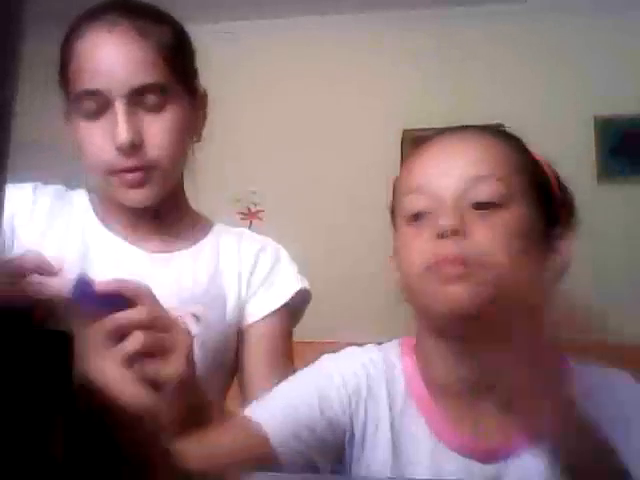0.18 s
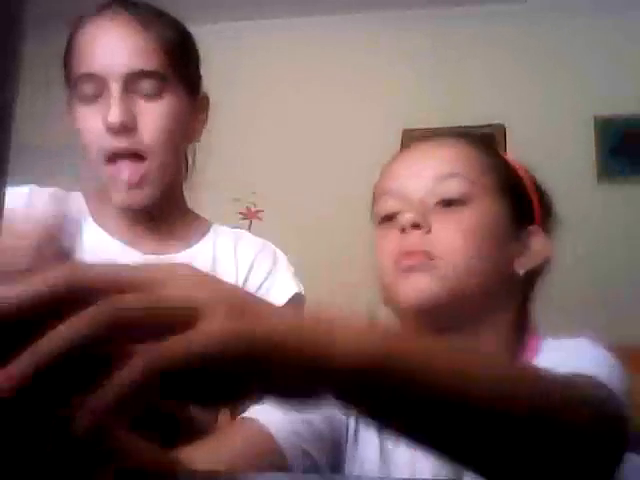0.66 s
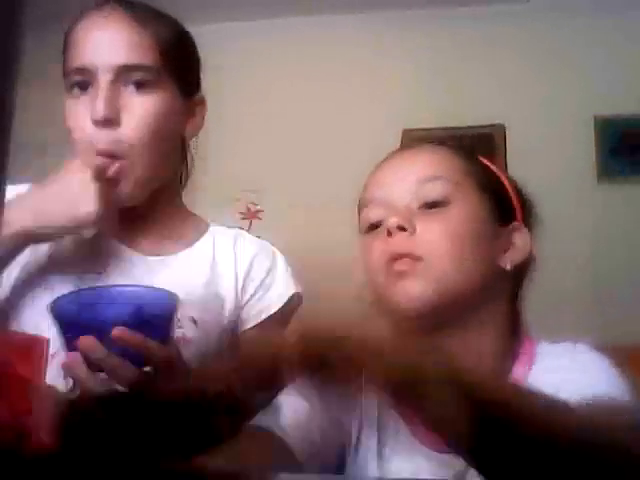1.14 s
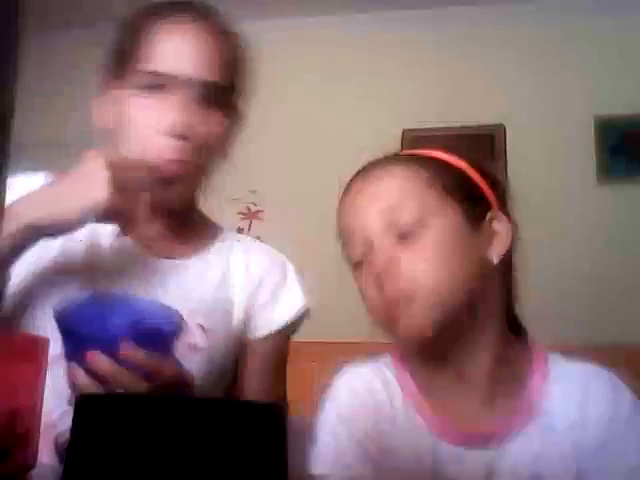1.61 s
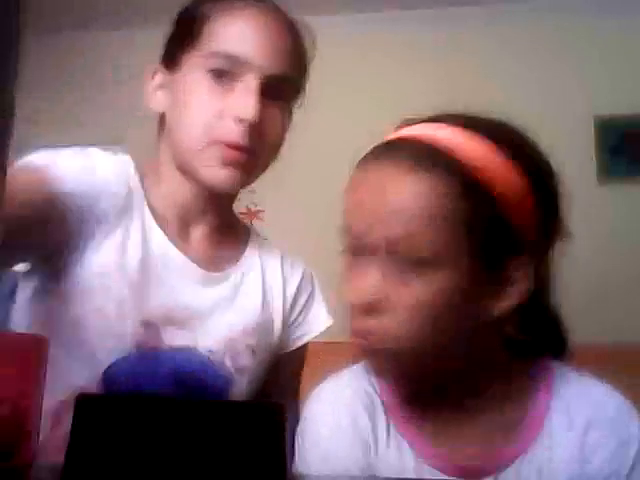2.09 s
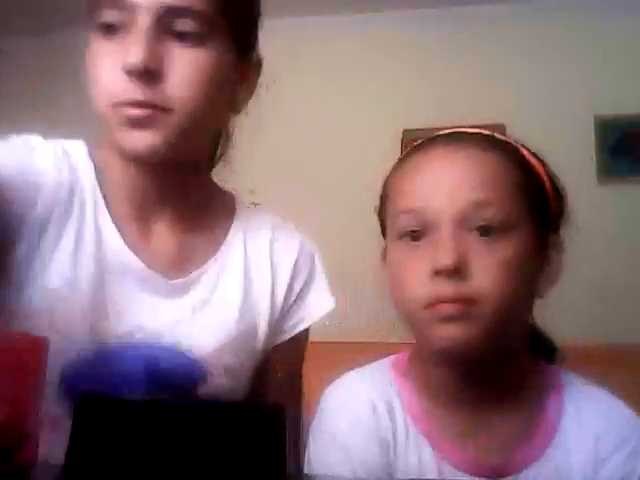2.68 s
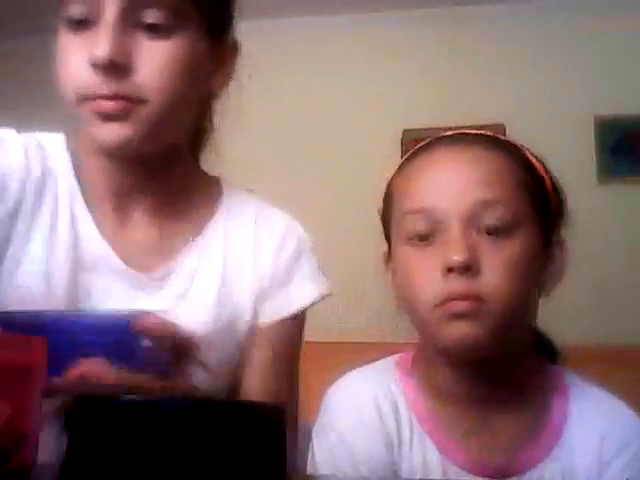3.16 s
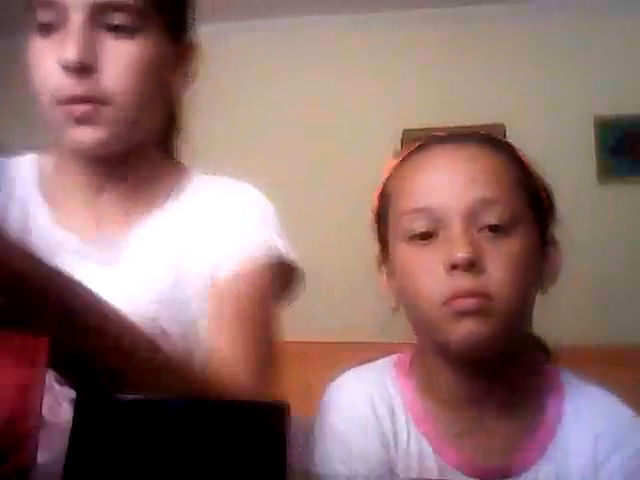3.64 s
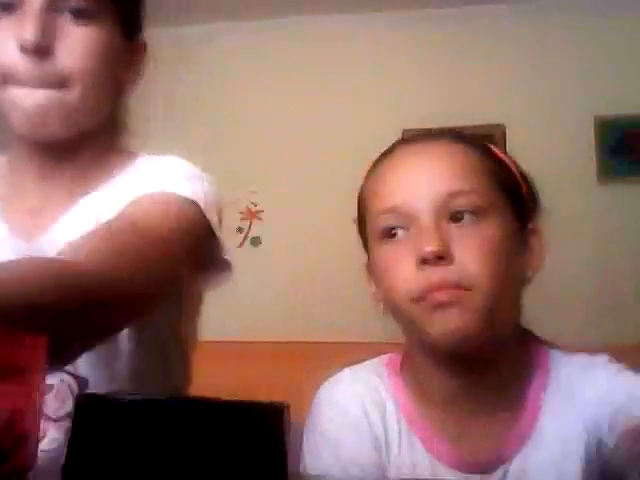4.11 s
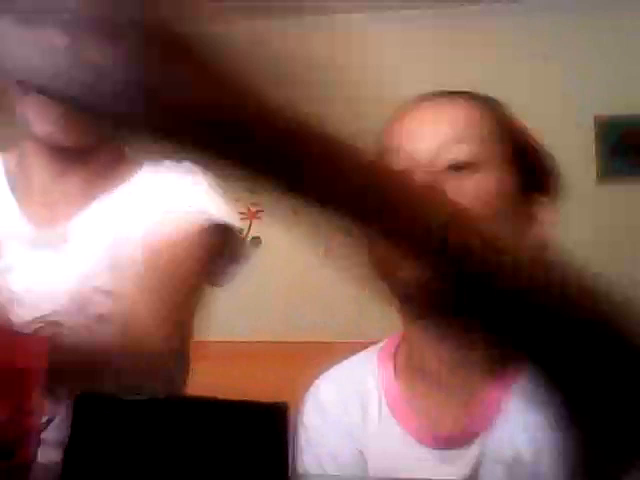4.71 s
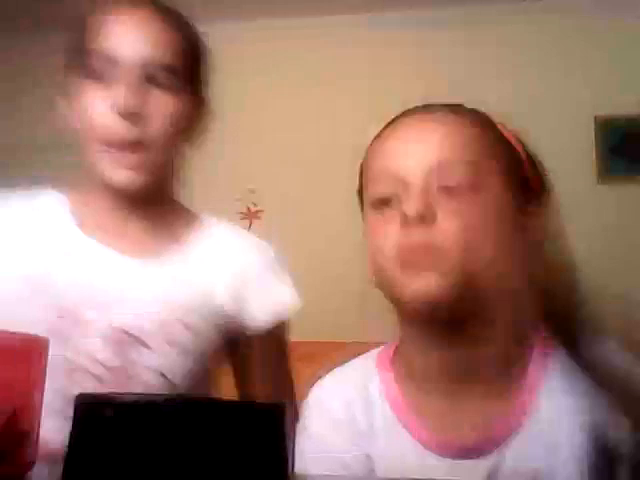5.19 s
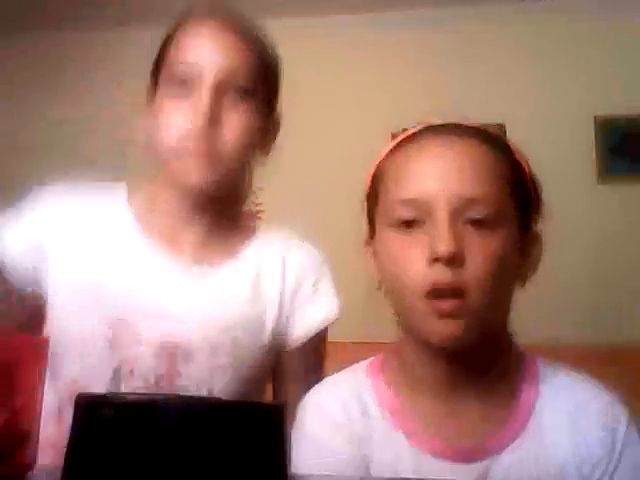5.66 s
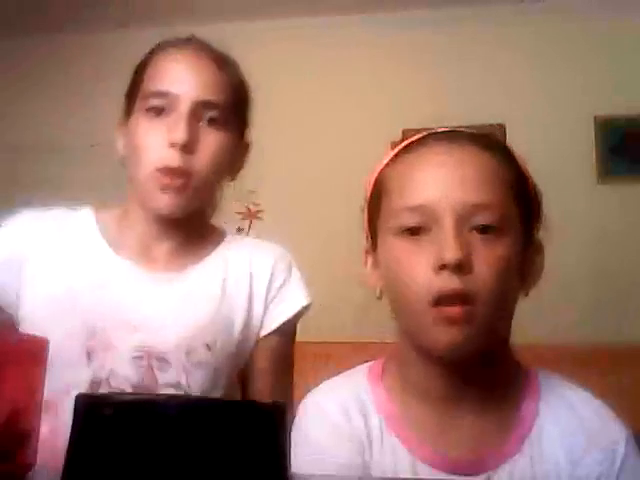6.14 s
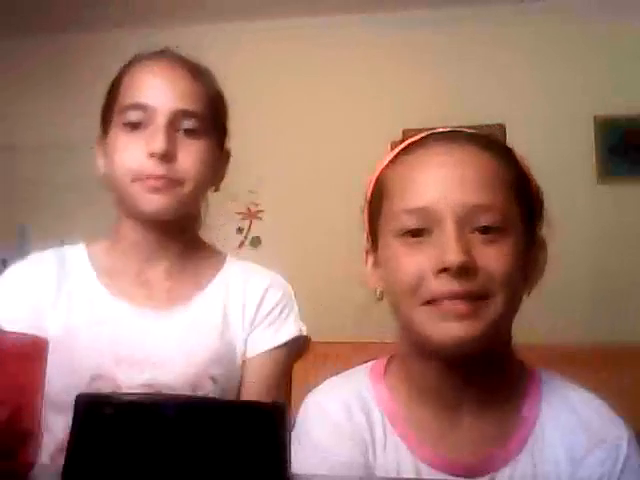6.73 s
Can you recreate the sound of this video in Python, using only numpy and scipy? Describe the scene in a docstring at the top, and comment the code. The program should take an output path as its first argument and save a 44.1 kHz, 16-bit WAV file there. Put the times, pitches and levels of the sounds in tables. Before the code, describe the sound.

A small furnished room, with the microphone almost on the wooden table. At once a firm double dish knock with a low thump, then lighter taps by 0.2 s. Faint scuffs and tiny knocks follow until a bright, hard clack at 1.17 s. Soft dry slides around 1.7 and 2.4 s, otherwise near silence with faint hum and hiss. At 3.0 s a heavy, clustered knock shakes the table. A short scrape at 3.95 s, then duller knocks and rubbing from 4.15 to 4.3 s. At 4.53 s a loud tumbling set-down; from 4.72 to 5.15 s the loudest blows, clipping, with deep thumps and clinking glass. A metal spoon bounces from 5.07 to 5.42 s, rattling ever faster to rest by about 5.7 s, with a brief scrape. Small quiet taps at 5.7, 6.0, 6.3, 6.5 and 6.7 s close it.

```python
"""Dishes knock on a wooden table close to a small microphone: each blow is noise driving dish and table
resonances, with bursts of bright noise for the hard contact. Heavy blows sway the table; a struck glass rings in
beating pairs of partials; a spoon bounces and rattles to rest; dishes slide in swelling grains of noise.
A small furnished room answers with decaying noise. Mains hum and hiss sit under a noise gate that opens
with louder sound, and the loudest blows clip."""
import sys
import numpy as np
from scipy import signal
from scipy.fft import rfft, irfft, next_fast_len
from scipy.io import wavfile
from scipy.ndimage import uniform_filter1d, minimum_filter1d, map_coordinates

SR = 44100
rng = np.random.default_rng(int(sys.argv[2]) if len(sys.argv) > 2 else 0)


def elevation(decibels):
    """Turn decibel levels (scalar or array-like) into linear amplitude ratios."""
    levels = np.asarray(decibels, float)
    return 10 ** (levels / 20)


def file_out(sig):
    """Save sig as 16-bit WAV at sys.argv[1]."""
    # one column per channel
    cols = np.atleast_2d(sig).T
    # limit, then scale
    lim = np.clip(cols, -1, 1)
    pcm = np.round(lim * 32767).astype(np.int16)
    wavfile.write(sys.argv[1], SR, pcm)


N = 300056

# edge of a hard contact: (frequency [Hz], relative level [dB per Hz])
CRACK_COLOUR = [(1600, -31), (2300, 0.5), (3200, 1), (3900, -3), (5000, -31)]
# treble of a hard contact: (frequency [Hz], relative level [dB per Hz])
SNAP_COLOUR = [(3000, -31.5), (4300, 4), (6000, -6), (8000, -15.5), (11000, -27.5), (14000, -33)]
# higher modes of the table top: (frequency [Hz], width [Hz], relative level [dB])
BOARD_MODES = [(609, 170, -4.5), (753.3, 140, 2.5), (993, 10, -7), (1210, 180, -1.5), (1396, 190, -3.5)]
GATE_DB = 10  # how far the noise gate pulls down when shut


def unit(x):
    """Scale to rms 1."""
    return x / np.sqrt(np.mean(x ** 2) + 1e-20)


def to_peak(x):
    """Scale to peak 1."""
    return x / np.abs(x).max()


def along(points, hz):
    """Read (frequency, value) points on a log frequency axis."""
    f, v = np.transpose(points)
    return np.interp(np.log(hz + 1), np.log(f + 1), v)


def filtered(x, response):
    """Shape x with a complex response of frequency."""
    m = next_fast_len(len(x) + 8192)
    return irfft(rfft(x, m) * response(np.fft.rfftfreq(m, 1 / SR)), m)[:len(x)]


def resonances(modes):
    """Causal response of (Hz, width Hz, dB) resonances, added with alternating sign."""
    def response(f):
        total = 0
        for k, (centre, width, db) in enumerate(modes):
            damping = 1j * f * width
            total = total + (-1) ** k * elevation(db) * damping / (centre * centre - f * f + damping)
        return total
    return response


def add(out, s, x, wet_db):
    """Place a sound at s seconds; the room answers with fresh noise that dies at its own rate in each band."""
    # room decay: (frequency [Hz], time to fall 60 dB [s])
    room_decay = [(100, 0.58), (800, 0.28), (3000, 0.24), (10000, 0.32)]
    hz, t, z = signal.stft(rng.standard_normal(SR // 2), SR, nperseg=256)
    fading = z * elevation(-60 * t / along(room_decay, hz)[:, None])
    tail = signal.istft(fading, SR, nperseg=256)[1]
    delayed = np.pad(x, (round(.004 * SR), 0))
    wet = signal.fftconvolve(delayed, tail / np.linalg.norm(tail)) * elevation(wet_db)
    wet[:len(x)] += x
    i = round(s * SR)
    out[i:i + len(wet)] += wet[:len(out) - i]


def knock(ring_hz, table_db, contact_s=.0045, soft_hz=1400):
    """A rough, yielding contact shakes a dish and the table top; peak about 1."""
    # deep modes of the table top: (frequency [Hz], width [Hz], relative level [dB])
    table_modes = [(183, 60, -15), (339, 39, -1), (476, 64, 1)]
    t = np.arange(SR // 8) / SR
    force = rng.standard_normal(len(t)) * (t / contact_s) ** 0.26 * np.exp(-2.5 * t / contact_s)
    force = filtered(force, lambda f: 1 / (1 + 1j * f / soft_hz) ** 3)
    # a dish that hardly touches the table rings clear, with its overtone
    free = np.clip((-17 - table_db) / 12, 0, 1)
    dish_modes = [(ring_hz, 110 - 55 * free, 4 * free), (2.76 * ring_hz, 300, -26 + 21 * free)]

    def dish_response(f):
        no_bass = (1j * f / ring_hz / (1 + 1j * f / ring_hz)) ** 2  # a small dish radiates no bass
        board = .4 * (1 - free) * resonances(BOARD_MODES)(f)
        return no_bass * (resonances(dish_modes)(f) + board)

    dish = to_peak(filtered(force, dish_response))
    table = to_peak(filtered(force, resonances(table_modes)))
    return dish + elevation(table_db) * table


def crack(colour, contact_s=0.0037):
    """A burst of coloured noise from a hard contact; peak 1."""
    t = np.arange(SR // 8) / SR
    noise = filtered(rng.standard_normal(len(t)), lambda f: elevation(along(colour, f)))
    return to_peak(noise * (1 - np.exp(-t / 0.00027)) * np.exp(-t / contact_s))


def knocks():
    """Each dish set down rings and knocks, with crack, snap and airy edge from the hard contact."""
    # dishes on the table: (time [s], level [dB], ring of the dish [Hz],
    # table over dish [dB], crack over dish [dB])
    blows = [(0.017, -17.5, 813, -14, -6), (0.027, -13.5, 840, -15.5, -9), (0.137, -21.5, 1114, -17, -10),
             (0.19, -26, 786, -9, -16), (0.472, -41, 810, -20, -22), (0.516, -38, 850, -17, -13),
             (0.769, -37.5, 888, -20, -17.5), (0.859, -50, 1040, -14, -1), (0.966, -42, 921, -20, -5.5),
             (1.157, -23, 1450, -12, 0), (1.168, -12.5, 1200, -30, -2.5), (1.174, -2, 1254, -34.5, -15),
             (1.657, -43, 1210, -22.5, -14.5), (1.762, -48, 759, -19, 3.5), (2.919, -52, 719, -11.5, -16.5),
             (2.988, -8, 1260, -8.5, -14.5), (2.995, -1, 763, -16, -20.5), (3.007, -8, 1215, -6.5, -15.5),
             (3.033, -9.5, 848, -8.5, -21), (3.055, -19.5, 1150, -6.5, -18), (3.074, -20, 790, -8, -18),
             (4.14, -36.5, 1540, -18, -12.5), (4.161, -12, 740, -8, -27), (4.177, -17.5, 800, -7.5, -44),
             (4.207, -18.5, 762, -13.5, -2.5), (4.294, -37, 837, -20.5, -13), (4.523, -4, 986, -11, -16.5),
             (4.531, -3, 809, -10.5, -21.5), (4.553, -6, 925, -14.5, -24.5), (4.563, -0.5, 730, -19, -25),
             (4.571, -11.5, 782, -13.5, -25), (4.721, -9.5, 767, -12.5, -10),
             (4.896, -10.5, 813, -7.5, -6.5), (4.928, 5, 1350, -17, -11), (4.94, -3.5, 785, -18.5, -16.5),
             (4.949, -7, 799, -13.5, -15), (4.965, -11, 1250, -15, -10.5), (5.009, 3.5, 1300, -20.5, -12),
             (5.07, -8, 1040, -27, -5.5), (5.076, -7, 1370, -26, -12), (5.083, -9.5, 1240, -15, -17.5),
             (5.707, -29.5, 746, -15, -5), (6.0, -38, 1070, -13, -0.5), (6.009, -33, 740, -8, -10),
             (6.328, -37, 1140, -14, -4.5), (6.337, -34.5, 705, -9.5, -22), (6.52, -36, 748, -13, -9),
             (6.549, -43, 1170, -17, -3.5), (6.719, -34.5, 732, -10, -9)]
    # top edge of dish on dish: (frequency [Hz], relative level [dB per Hz])
    airy_colour = [(5000, -30), (7000, 1.5), (11000, -4.5), (14000, -8)]
    out = np.zeros(N)
    for s, db, ring_hz, table_db, crack_db in blows:
        airy_db = -8 - 0.7 * (table_db + 32)  # lost when the table takes the blow
        edge = crack(CRACK_COLOUR) + elevation(-7) * crack(SNAP_COLOUR) + elevation(airy_db) * crack(airy_colour)
        blow = knock(ring_hz, table_db) + elevation(crack_db) * edge
        add(out, s, elevation(db) * blow, wet_db=-6.5)
    return out


def thumps():
    """Heavy blows set the whole table swaying on its legs: a low decaying tone over deep resonant noise."""
    # sways of the table: (time [s], tone level [dB], relative level of the deep noise [dB])
    sways = [(0.024, -27.5, -47.5), (0.499, -67, -58.5), (1.199, -52.5, -52), (2.993, -28.5, -52),
             (3.716, -44.5, -53.5), (3.942, -63, -58), (4.164, -42, -45.5), (4.527, -26, -38.5),
             (4.72, -40, -52.5), (4.899, -30, -38.5), (4.933, -25, -27.5), (5.011, -28.5, -28.5),
             (5.069, -38, -39), (5.397, -63, -44.5)]
    out, t = np.zeros(N), np.arange(SR // 2) / SR
    deep_modes = [(31, 10, -1.5), (52, 17, -1.5)]  # (Hz, width Hz, dB)
    for s, db, deep_db in sways:
        sway = elevation(db - 60 * t / 0.37) * np.sin(2 * np.pi * 98 * t) * (1 - np.exp(-t / 0.0019))
        rumble = unit(filtered(rng.standard_normal(len(t)), resonances(deep_modes)))
        deep = rumble * elevation(deep_db + 5 - 60 * t / .5) * (1 - np.exp(-t / 0.014))
        add(out, s, sway + deep, wet_db=-7.5)
    return out


def glass():
    """Each partial is a beating pair roughened by contact chatter; a new blow stops the old ring."""
    # blows on the glass: (time [s], level [dB], lowest partial over the rest [dB],
    # hardness [dB per octave])
    clinks = [(4.5437, -50.5, 29, -18.5), (4.7213, -20, -10, -6.5), (4.8979, -12.5, 1, -4.5),
              (4.9295, -20.5, 8, 1.5), (4.9467, -23.5, 15, 5), (4.9659, -15, 9, -3), (4.9834, -14, 2.5, 0),
              (5.0158, -21.5, -1.5, 5), (5.0398, -19, -9, -1), (5.0824, -32.5, -5.5, -2),
              (5.1392, -28.5, -8.5, -0.5), (5.1748, -41, -6, 4.5)]
    # partials, five main ones first: (frequency [Hz], time to fall 60 dB [s],
    # split of the pair [Hz], relative level [dB])
    partials = [(1793, 0.39, 5.3, -2.15), (3798, 0.099, 13, 4.5), (6256, 0.2, 12, -5),
                (9160, 0.14, 65, -10), (12550, .24, 66, -18.5), (5120, 0.2, 10, -16), (7050, 0.15, 15, -14),
                (7700, .1, 25, -21), (8450, 0.09, 22, -19), (10120, 0.099, 66, -20.5),
                (12300, 0.055, 34, -21), (13420, 0.11, 33, -19)]
    minor_octaves = 2.2  # the weak partials answer hardness as if this far up
    out, t = np.zeros(N), np.arange(SR // 3) / SR
    ends = [row[0] for row in clinks[1:]] + [clinks[-1][0] + 0.023]
    for (s, blow_db, lowest_db, hard_db), end in zip(clinks, ends):
        noise = filtered(rng.standard_normal(len(t)), lambda f: f / (f + 3000) / (1 + f / 6000))
        ring = elevation(blow_db + 1.1 * hard_db - 20.5 - 60 * t / 0.17) * unit(noise)
        for k, (hz, t60, split, db) in enumerate(partials):
            # high partials are disturbed most
            chatter = elevation(hz / 3300 * map_coordinates(rng.standard_normal(60), [t * 120]))
            second = np.sin(2 * np.pi * ((hz - split) * t + rng.random()))
            pair = np.sin(2 * np.pi * hz * t) + 0.53 * second
            # the weak partials wake only under hard blows
            reach = np.log2(hz / partials[1][0]) if k < 5 else minor_octaves
            colour_db = hard_db * reach if k else lowest_db
            ring += elevation(blow_db + colour_db + db - 60 * t / t60) * chatter * pair
        stop = elevation(-np.maximum(t - (end - s), 0) * 5100)
        add(out, s, ring * (1 - np.exp(-t / 0.001)) * stop, wet_db=-12.0)
    return out


def spoon():
    """Bounces ring the spoon, each favouring other modes, and knock the table; it then rocks ever faster to rest."""
    # bounces: (time [s], level [dB], knock over ring [dB], relative treble level [dB], knock [Hz])
    bounces = [(5.0697, -6, -1, -24, 1540), (5.1161, -11.5, -20, -29, 1250),
               (5.1673, 0.5, -3.5, -19.5, 1160), (5.2361, -4.5, -4.5, -23, 997),
               (5.271, -10, -6.5, -38, 1070), (5.2913, -18, -5, -28, 1060), (5.3005, -21, -3, -32, 1090),
               (5.3088, -16, -6.5, -30, 1050), (5.334, -14.5, -1.5, -9.5, 767),
               (5.3711, -10, -4, -18.5, 1250), (5.3916, -16.5, -1.5, -32, 950),
               (5.4078, -15, -5.5, -13, 710), (5.4242, -19.5, -5, -31, 1150), (5.6783, -36, -11, -18, 729),
               (5.7005, -31, -5, -24.5, 1107), (5.7072, -31.5, 0.5, -16, 732)]
    # modes of the spoon: (frequency [Hz], relative level [dB], time to fall 60 dB [s])
    spoon_modes = [(2815, 5, 0.019), (3680, -1.5, 0.017), (4000, 3.5, 0.026), (4400, -5, 0.037),
                   (6990, -21.5, 0.028)]
    out, t = np.zeros(N), np.arange(SR // 8) / SR
    for s, db, knock_db, treble_db, knock_hz in bounces:
        # held and damped differently each time
        shares, bends = rng.normal(0, [[3.5], [.015]], (2, len(spoon_modes)))
        ring = 1.5 * elevation(-60 * t / .022) * np.sin(2 * np.pi * 2730 * t)  # the handle
        for (hz, level, t60), share, bend in zip(spoon_modes, shares, bends):
            ring += elevation(level + share - 60 * t / t60) * np.sin(2 * np.pi * hz * (1 + bend) * t)
        edge = 0.38 * crack(CRACK_COLOUR, contact_s=0.0013)
        edge += elevation(treble_db + 10) * crack(SNAP_COLOUR, contact_s=0.00092)
        # the table answers just after the metal
        answer = np.roll(knock(knock_hz, -15.5, contact_s=0.0067), round(.0017 * SR))
        add(out, s, elevation(db) * (to_peak(ring) + elevation(knock_db) * answer + edge), wet_db=-11.5)

    settle_s, length_s, release_s = 5.432, 0.22, 0.074  # start, rocking, dying away
    since = np.arange(N) / SR - settle_s
    rate = np.interp(since, [0, length_s + release_s], [70, 260])  # taps per second
    taps = np.diff(np.floor(np.cumsum(rate) / SR), prepend=0) * elevation(4.7 * rng.standard_normal(N))
    taps += 0.086 * rng.standard_normal(N)
    moving = (since > 0) * elevation(-30 * np.maximum(since - length_s, 0) / release_s)
    elapsed = np.maximum(since, 0)
    metal = moving * elevation(-38 - 62.5 * elapsed)  # start dB, fading dB per s
    wood = moving * elevation(-34 - 120 * elapsed)
    modes = [(hz, 300, db) for hz, db, t60 in spoon_modes]
    bright = filtered(taps, lambda f: resonances(modes)(f) + 0.51 * elevation(along(SNAP_COLOUR, f)))
    dull = filtered(taps, resonances(BOARD_MODES))
    add(out, 0, metal * unit(bright) + wood * unit(dull), wet_db=-5.0)
    return out


def slides():
    """A dragged base catches in grains heard through the table and as dry hiss; pressure swells and eases."""
    # strokes: (time of greatest pressure [s], rise [s], fall [s], table level [dB], hiss level [dB])
    strokes = [(0.238, 0.033, 0.048, -62, -61), (0.48, 0.0064, 0.039, -53, -78),
               (0.53, 0.067, 0.14, -59, -77), (0.731, 0.11, 0.043, -54, -63),
               (0.786, 0.028, 0.16, -57, -62), (1.03, 0.067, 0.12, -58.5, -66),
               (1.115, 0.046, .02, -66.5, -61.5), (1.664, 0.067, 0.085, -56.5, -60.5),
               (1.697, 0.019, .07, -67.5, -50.5), (1.768, .015, 0.057, -68, -55),
               (1.64, .06, .06, -73, -63.5), (2.416, 0.079, 0.11, -52.5, -81),
               (2.478, 0.069, 0.11, -58, -59), (3.801, 0.056, 0.09, -71, -82),
               (3.956, 0.029, 0.042, -30, -45), (3.92, .02, 0.026, -55, -57.5),
               (4.175, 0.05, 0.057, -34.5, -56), (4.205, 0.023, 0.044, -38, -55.5),
               (4.267, 0.016, .03, -34, -52), (4.291, 0.016, 0.016, -32.5, -60),
               (5.531, 0.051, 0.068, -38, -60), (0.59, .04, .03, -66, -64), (4.44, .04, .05, -63.5, -79)]
    # a dragged dish base: (frequency [Hz], width [Hz], relative level [dB])
    base_modes = [(731, 110, -1), (1150, 560, -13.5), (1555, 390, -9.5)]
    # dB sunk one rise or fall time from the top; roundness of the top
    stroke_db, stroke_power = 31.5, 1.6
    out, t = np.zeros(N), np.arange(N) / SR

    def grains():
        swell = unit(uniform_filter1d(rng.standard_normal(N), size=90))
        return rng.standard_normal(N) * elevation(4.5 * swell)

    wood, dry_hiss = np.zeros(N), np.zeros(N)
    for s, rise, fall, table_db, hiss_db in strokes:
        distance = np.minimum(np.where(t < s, (s - t) / rise, (t - s) / fall), 4)
        sunk_db = stroke_db * distance ** stroke_power
        wood += elevation(table_db - sunk_db)
        dry_hiss += elevation(hiss_db - sunk_db)
    hiss = filtered(grains(), lambda f: elevation(along(CRACK_COLOUR, f)) + elevation(along(SNAP_COLOUR, f) - 2))
    base = filtered(grains(), resonances(base_modes))
    add(out, 0, wood * unit(base) + dry_hiss * unit(hiss), wet_db=-10.5)
    return out


def noise_floor(waver_db=2.0):
    """Locked mains lines, unsteady in strength, over preamp hiss, as they stand with the gate open."""
    # mains lines: (frequency, rounded below to a multiple of the mains [Hz], level with the gate shut [dB])
    hum_lines = [(48.4, -69), (102.3, -81.5), (150.7, -70.5), (199.2, -87), (247.6, -79), (349.9, -83.5)]
    # preamp hiss: (frequency [Hz], relative level [dB per Hz])
    hiss_colour = [(15, -13.5), (40, -1), (70, -9.5), (120, -14), (250, -16), (550, -19), (2000, -25.5),
                   (13100, -30), (15500, -57)]
    mains_hz = 50
    t = np.arange(N) / SR
    hum = np.zeros(N)
    for hz, db in hum_lines:
        waver = waver_db * map_coordinates(rng.standard_normal(80), [t * 10])
        line_hz = round(hz / mains_hz) * mains_hz
        hum += np.sqrt(2) * elevation(db + waver) * np.sin(2 * np.pi * line_hz * t)
    hiss = unit(filtered(rng.standard_normal(N), lambda f: elevation(along(hiss_colour, f))))
    return elevation(GATE_DB) * (hum + elevation(-69) * hiss)


def scene():
    """Everything at the one microphone."""
    return (knocks() + thumps() + glass() + spoon() + slides() + noise_floor())[None]


def roll_off(x):
    """The treble ends steeply here."""
    return signal.sosfilt(signal.butter(12, 16650, fs=SR, output="sos"), x)


def record(dry):
    """The microphone ends near 14 kHz; a noise gate follows the level above the hum; the converter clips."""
    heard = filtered(dry[0], lambda f: 1 / (1 + (f / 13900) ** 40))
    power = filtered(heard, lambda f: f > 450) ** 2
    level_db = 10 * np.log10(np.abs(uniform_filter1d(power, size=900, origin=400)) + 1e-12)
    gain_db = np.clip(1.1 * (level_db + 47), -GATE_DB, 0)  # fully open from -47 dB
    held = -minimum_filter1d(-gain_db, size=500, origin=130)  # opens just ahead, shuts late
    gated = heard[None] * elevation(uniform_filter1d(held, size=240))
    clipped = gated / (1 + np.abs(gated / .71) ** 8) ** (1 / 8)  # rounded limit at .71
    return roll_off(clipped)


dry = scene()
out = record(dry)
file_out(out)
```